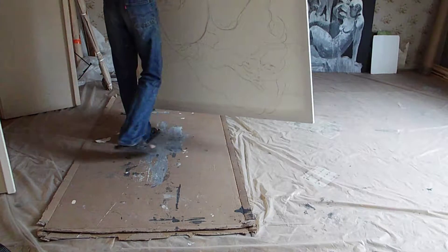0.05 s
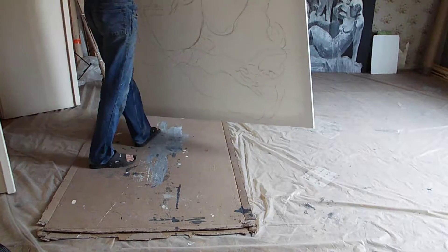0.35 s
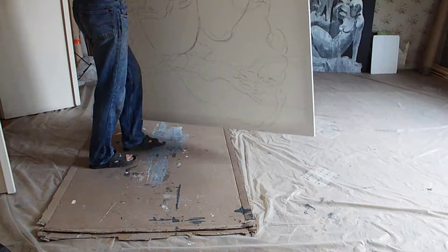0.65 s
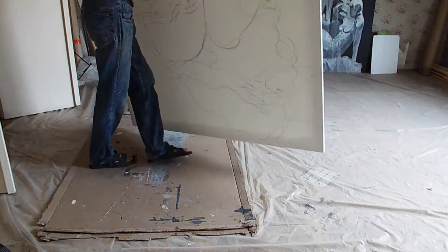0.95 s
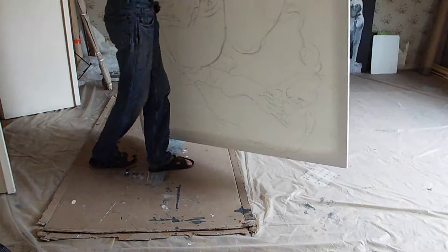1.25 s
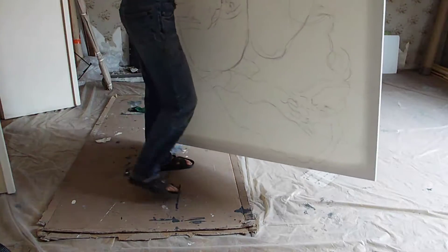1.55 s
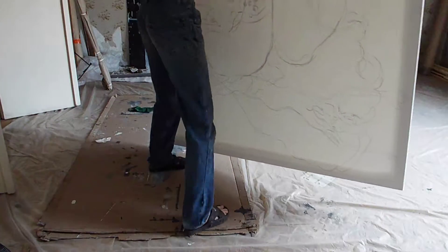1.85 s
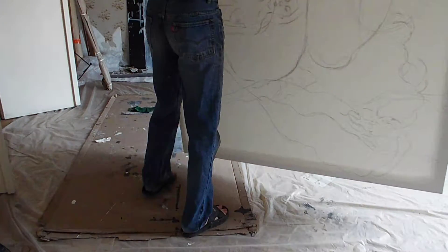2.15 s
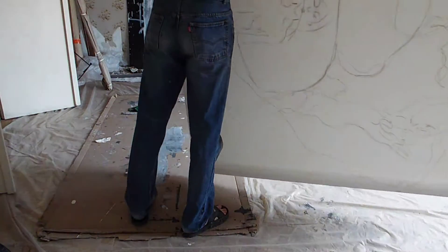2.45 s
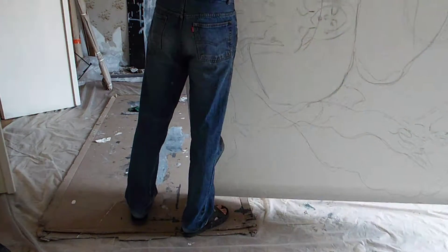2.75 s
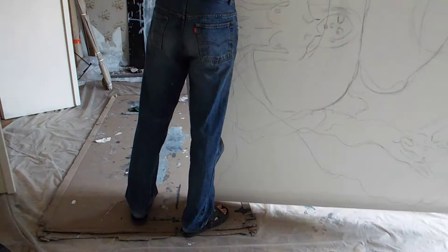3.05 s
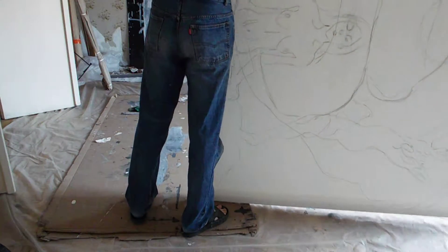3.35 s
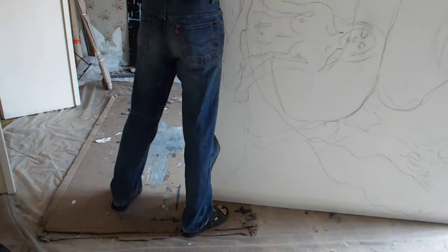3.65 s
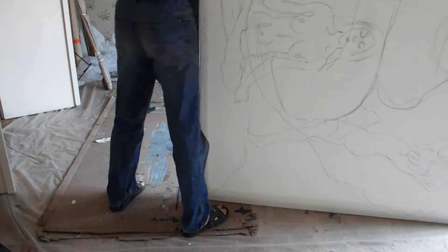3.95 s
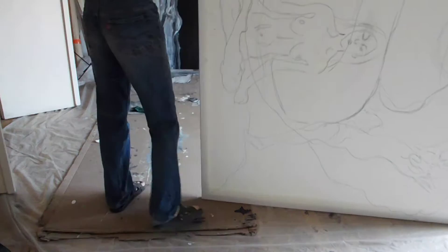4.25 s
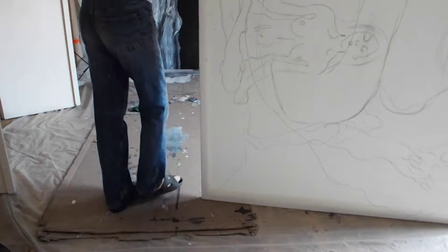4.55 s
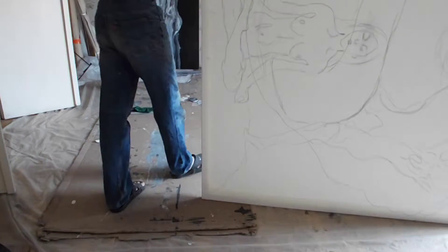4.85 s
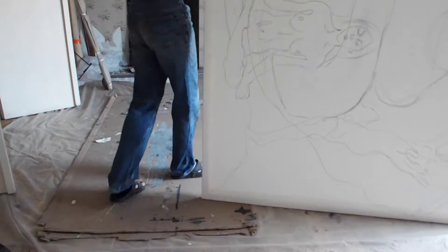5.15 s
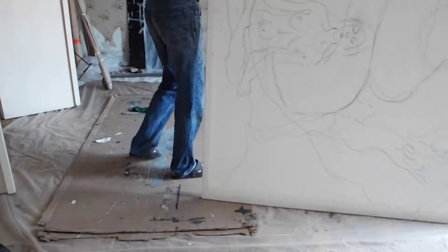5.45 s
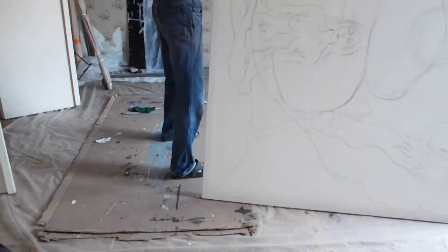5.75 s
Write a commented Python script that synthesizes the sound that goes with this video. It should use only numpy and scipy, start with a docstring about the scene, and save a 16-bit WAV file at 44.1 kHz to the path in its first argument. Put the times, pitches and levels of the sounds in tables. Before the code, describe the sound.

Scuffing footsteps on cardboard, then a big canvas lands with a ringing hollow thud amid light plastic rustling in a bare room.

```python
"""A big stretched canvas is carried across a studio and set down with one hollow, drum-like thud.
The cloth sways on the way; the wooden frame knocks on the floor and the cloth rings in its modes.
Sandals scuff, thump, tick and squeak on cardboard, denim brushes, and plastic sheeting rustles
as the canvas is shifted. The bare room rings on, over room tone and a faint distant rush."""
import sys
import numpy as np
from scipy import signal
from scipy.fft import rfft, irfft, next_fast_len
from scipy.io import wavfile

SR = 44100
rng = np.random.default_rng(int(sys.argv[2]) if len(sys.argv) > 2 else 0)


def store_wav(level_fs):
    """Save 16-bit WAV to argv[1]."""
    pcm = np.round(np.clip(np.atleast_2d(level_fs), -1, 1) * 32767)
    wavfile.write(sys.argv[1], SR, pcm.T.astype(np.int16))


N = 264159
T = np.arange(N) / SR


def amp(db):
    """Decibels to gain."""
    return 10 ** (np.asarray(db) / 20)


def unit_rms(x):
    """x scaled to rms 1."""
    return x / np.sqrt(np.mean(x ** 2) + 1e-20)


def log_interp(points, hz):
    """(freq_hz, value) points read on a log axis."""
    freq_hz, values = np.transpose(points)
    return np.interp(np.log(hz + 1), np.log(freq_hz + 1), values)


def gain_curve(points):
    """(time_s, level_db) points as one gain per sample."""
    return amp(np.interp(T, *np.transpose(points)))


def filtered(x, response):
    """x through a gain that depends on frequency."""
    n = x.shape[-1]
    size = next_fast_len(n + 8192, True)
    return irfft(rfft(x, size) * response(np.fft.rfftfreq(size, 1 / SR)), size)[..., :n]


def coloured(x, spectrum):
    """x shaped by (freq_hz, gain_db) points, at rms 1."""
    return unit_rms(filtered(x, lambda hz: amp(log_interp(spectrum, hz))))


def noise(spectrum):
    """Coloured Gaussian noise."""
    return coloured(rng.standard_normal(N), spectrum)


def resonance(centre_hz, width_hz):
    """Noise in one resonant band."""
    white = rng.standard_normal(N)
    return unit_rms(filtered(white, lambda hz: 1 / (1 + ((hz - centre_hz) / width_hz) ** 2)))


def slips(rate_per_s, spread_db):
    """Tiny random slips of uneven size."""
    impulses = (rng.random(N) < rate_per_s / SR) * rng.standard_normal(N)
    return unit_rms(impulses * amp(spread_db * rng.standard_normal(N)))


def burst(start_s, rise_s, hold_s, t60_s):
    """Envelope: linear rise, hold, exponential decay."""
    age_s = T - start_s
    decay = np.exp(-np.log(1000) * np.clip((age_s - rise_s - hold_s) / t60_s, 0, 10))
    return np.clip(age_s / rise_s, 0, 1) * decay


def widen(pair, width):
    """Mid and side to left and right; width is (freq_hz, side_db) points."""
    side = filtered(pair[1], lambda hz: amp(log_interp(width, hz)))
    return np.array([pair[0] + side, pair[0] - side])


# room tone spectrum: freq_hz, gain_db
TONE_SPECTRUM = [(15, -19), (25, -1), (98, -2), (136, -0.5), (178, -10.5), (252, -9.5), (305, -12),
                 (508, -15), (720, -15.5), (994, -18.5), (2550, -23.5), (4240, -26), (6020, -21),
                 (8770, -31.5), (15400, -37.5)]
# its stereo width: freq_hz, side_db
TONE_WIDTH = [(30, -10), (100, -7), (350, -4.5), (1200, -7), (4000, -6.5), (14000, -1.5)]


def room_tone():
    """Steady, low-heavy stereo noise."""
    return amp(-52) * widen([noise(TONE_SPECTRUM), noise(TONE_SPECTRUM)], TONE_WIDTH)


def cloth_sway(sway_hz=33.2, hum_hz=246.2):
    """Swung round, the cloth sways in its lowest mode and hums in a higher one, never quite still."""
    swing = amp(-55.5) + amp(-45.5) * burst(0, 0.35, 0, t60_s=3.6)
    return swing * (resonance(sway_hz, 4) + amp(-16) * resonance(hum_hz, 12))


# distant rush: time_s, level_db
RUSH_LEVELS = [(0, -54.5), (.9, -58.5), (1.6, -61.5), (2.4, -67.5), (6, -65)]


def distant_rush():
    """A faint midrange band, loudest at the start."""
    return gain_curve(RUSH_LEVELS) * resonance(centre_hz=1054, width_hz=330)


# sole friction spectrum: freq_hz, gain_db
SOLE_SPECTRUM = [(530, -29), (900, -19), (1610, -11), (3840, -7.5), (4320, -4), (5750, 1.5), (6710, -1.5),
                 (7560, -7.5), (10300, -13), (13100, -19), (15400, -34)]
# sandal on cardboard: start_s, stroke_s, scuff_db, thump_db, pressure_0_to_1
FOOTFALLS = [(.142, 0.038, -39.5, -57.5, 0.3), (.2, 0.087, -45.5, -46.5, 0.42),
             (0.284, 0.05, -35.5, -58, 1), (.394, 0.045, -37.5, -62, 0.14), (0.996, 0.026, -35, -48, .25),
             (1.293, 0.044, -31, -52, 0.24), (1.754, 0.15, -46, -47, 0.5), (1.956, 0.074, -36.5, -52, 0.18),
             (2.223, 0.079, -29, -51.5, 0.04), (2.78, 0.078, -45.5, -65.5, 1),
             (4.853, 0.046, -48.5, -48.5, 0.2), (4.95, .07, -48.5, -54.5, 0.45),
             (5.205, 0.078, -42.5, -49.5, 0.34), (5.57, 0.15, -61, -52.5, 0.82),
             (5.75, 0.039, -44.5, -59, 0.84), (5.868, 0.092, -42.5, -56, .95)]
RISE_SHARE = 0.31  # of a stroke


def sole_scuffs(drag_db=-16, drag_s=0.096, t60_s=0.13):
    """Dense slips under a sole: a stroke, then a weaker drag. Pressure adds rasp, a light brush fizz."""
    grit = coloured(slips(rate_per_s=18000, spread_db=2.5), SOLE_SPECTRUM)
    rasp = filtered(grit, lambda hz: 1 / (1 + (hz / 3000) ** 4))
    fizz = filtered(grit, lambda hz: 1 - 1 / (1 + (hz / 8000) ** 8))
    out = np.zeros(N)
    for start_s, stroke_s, scuff_db, _, pressure in FOOTFALLS:
        rise_s = RISE_SHARE * stroke_s
        stroke = burst(start_s, rise_s, stroke_s - rise_s, t60_s)
        drag = amp(drag_db) * burst(start_s, rise_s, drag_s, t60_s)
        rasp_db, fizz_db = 1 + 6.5 * pressure, 4 - 12 * pressure
        friction = grit + (amp(rasp_db) - 1) * rasp + (amp(fizz_db) - 1) * fizz
        out += amp(scuff_db) * np.maximum(stroke, drag) * friction
    return out


# floorboard thump spectrum: freq_hz, gain_db
BOARD_SPECTRUM = [(30, -14), (55, -1), (110, 5), (170, -4), (260, -5.5), (500, -16.5), (1200, -50)]
# cardboard clap spectrum: freq_hz, gain_db
CLAP_SPECTRUM = [(120, -9.5), (280, -10.5), (550, -4), (900, -11), (1600, -13), (4000, -38)]


def foot_thumps():
    """Each footfall thumps the boards; more pressure claps the cardboard harder."""
    boards, clap = noise(BOARD_SPECTRUM), noise(CLAP_SPECTRUM)
    out = np.zeros(N)
    for start_s, stroke_s, _, thump_db, pressure in FOOTFALLS:
        envelope = burst(start_s, RISE_SHARE * stroke_s, 0, t60_s=0.64)
        out += amp(thump_db) * envelope * (boards + amp(-5.5 + 10.5 * pressure) * clap)
    return out


# sandal snaps and popping creases: start_s, level_db, pitch_hz
TICKS = [(0.242, -31.5, 1350), (0.3018, -26, 3660), (0.3087, -18.5, 6000), (1.1392, -31, 5130),
         (1.6387, -44, 5340), (1.7413, -26, 1920), (1.7493, -21, 1560), (4.8815, -38, 4860)]


def ticks(crack_db=-8, ring_cycles=12):
    """A snap is a brief ring with a short crack; lower snaps have duller cracks."""
    crack = noise([(300, -9.5), (1400, 2.5), (3000, 3.0), (6500, 5.5), (14000, -16)])
    out = np.zeros(N)
    for start_s, level_db, pitch_hz in TICKS:
        ring = np.sin(2 * np.pi * pitch_hz * (T - start_s))
        ring *= burst(start_s, 0.00035, 0.00043, t60_s=ring_cycles / pitch_hz)
        cutoff_hz = min(2.95 * pitch_hz, SR / 3)
        dulled = signal.lfilter(*signal.butter(2, cutoff_hz, fs=SR), crack)
        dulled *= burst(start_s, 0.0003, 0.0016, t60_s=0.018)
        out += amp(level_db) * (ring + amp(crack_db) * dulled)
    return out


# denim brushing as the legs move: time_s, level_db
DENIM_LEVELS = [(0, -76), (.9, -74), (1.25, -49.5), (1.6, -59), (2.6, -66), (3, -54), (4.6, -63), (6, -52)]
# canvas and feet shoving over the sheeting: start_s, hold_s, level_db
SHOVES = [(3.062, .01, -46.5), (3.286, 0.17, -38.5), (3.485, .04, -31), (3.745, .01, -41.5),
          (3.891, 0.021, -39), (4.054, 0.055, -39), (4.205, 0.039, -43.5), (5.03, 0.21, -45.5),
          (5.207, 0.23, -43), (5.507, 0.031, -52), (5.9, 0.061, -45.5)]
# rustle spectrum: freq_hz, gain_db
RUSTLE_SPECTRUM = [(590, -50), (1000, -32), (1260, -14), (1390, -13.5), (1600, -14.5), (2500, -13),
                   (3140, -8), (4690, -6), (5760, -0.5), (9000, -13), (12700, -17.5), (15400, -31)]


def denim_and_sheeting(rise_s=0.047, settle_t60_s=0.78):
    """Denim brushes softly; thin plastic crinkles with each shove, then settles."""
    shove_power = sum((amp(level_db) * burst(start_s, rise_s, hold_s, settle_t60_s)) ** 2
                      for start_s, hold_s, level_db in SHOVES)
    crinkle = coloured(slips(rate_per_s=12000, spread_db=1.0), RUSTLE_SPECTRUM)
    return np.sqrt(shove_power + gain_curve(DENIM_LEVELS) ** 2) * crinkle


# faint sole squeaks: start_s, hold_s, pitch_hz, width_hz, level_db
SQUEAKS = [(1.318, 0.086, 1948, 400, -49.5), (5.227, 0.11, 1395, 7.2, -52.5), (5.656, 0.02, 1680, 227, -47),
           (5.7, .012, 1684, 93, -50), (5.748, .018, 1867, 66, -55)]


def sole_squeaks(rise_s=0.013):
    """Rubber sticks and slips: a tone whose phase wanders."""
    out = np.zeros(N)
    for start_s, hold_s, pitch_hz, width_hz, level_db in SQUEAKS:
        wander_rad = np.cumsum(rng.standard_normal(N)) * np.sqrt(2 * np.pi * width_hz / SR)
        tone = unit_rms(np.sin(2 * np.pi * pitch_hz * T + wander_rad))
        out += amp(level_db) * burst(start_s, rise_s, hold_s, t60_s=0.049) * tone
    return out


# wooden knock spectrum: freq_hz, gain_db
WOOD_SPECTRUM = [(50, -33), (110, -5.5), (220, 2.5), (380, -3), (550, -6.5), (750, -11.5), (1000, -14),
                 (1500, -11), (2200, -19), (3500, -28.5), (9000, -58)]
# sheeting slap spectrum: freq_hz, gain_db
SLAP_SPECTRUM = [(1200, -38), (2000, -17), (2900, -11), (4200, -2), (5200, -3), (6500, 2.5), (8500, -16),
                 (12500, -25), (15500, -42)]
# frame edge meeting the floor: start_s, wood_db, slap_db, crack_db
CONTACTS = [(3.4529, -8.5, -13, -14.5), (3.4621, -10, -18, -10), (3.467, -14.5, -17, -12),
            (3.482, -10, -19, -24)]


def frame_knocks():
    """The frame lands in quick contacts, each a wooden knock, a slap on the sheeting and a crack."""
    wood, slap = noise(WOOD_SPECTRUM), noise(SLAP_SPECTRUM)
    crack = noise([(400, 8), (1200, -6), (3000, -0.5), (6500, 1.0), (12000, -8), (16000, -23)])
    out = np.zeros(N)
    for start_s, wood_db, slap_db, crack_db in CONTACTS:
        out += amp(wood_db) * burst(start_s, 0.00072, 0, t60_s=0.068) * wood
        out += amp(slap_db) * burst(start_s, 0.00044, 0, t60_s=0.047) * slap
        out += amp(crack_db) * burst(start_s, 0.00055, 0.00092, t60_s=0.0053) * crack
    return out


# modes of stretched cloth and frame: pitch_hz, level_db, t60_s
CANVAS_MODES = [(33.2, -19.5, 1.4), (76.5, -26, 1.73), (103.8, -27, 1.95), (121, -19, 1.17),
                (142.3, -22.5, 1.22), (159.2, -12.5, 0.84), (175.7, -29, 0.8), (222, -20, 0.28),
                (240.5, -15, 0.66), (247.4, -29, 0.97), (297.2, -25, 0.98), (334, -38, 0.86),
                (346, -17, 0.53), (363.5, -23.5, 0.85), (379.5, -18, 0.29), (476, -45, 0.43),
                (516, -24, 0.61), (530, -21.5, 0.58), (613, -33.5, 0.98), (752, -36.5, 1.16),
                (794, -36.5, 1), (820, -33.5, 0.81), (1360, -53, .6), (1579, -28, 0.66), (1690, -39, 0.42)]


def canvas_drum():
    """One deep push on landing, then a slack-drum ring; neighbouring modes swing in opposite senses."""
    start_s = CONTACTS[0][0]

    def mode(pitch_hz, level_db, t60_s):
        envelope = amp(level_db) * burst(start_s, 0.0034, 0, t60_s)
        return envelope * np.cos(2 * np.pi * pitch_hz * (T - start_s))

    ring = sum((-1) ** k * mode(*row) for k, row in enumerate(CANVAS_MODES))
    return ring - mode(pitch_hz=155, level_db=-7, t60_s=0.11)


# bare room's decay: freq_hz, t60_s
ROOM_DECAY = [(60, 0.37), (250, 0.94), (1000, 0.81), (3000, 0.65), (6000, 0.59), (10000, 0.36),
              (15000, 0.23)]
# stereo width of its tails: freq_hz, side_db
TAIL_WIDTH = [(200, -24), (700, -17), (2000, -28), (4000, -15), (8000, -5), (14000, -5)]


def room(x, wet_db, crossfade_hz, tails, build_s=0.0046):
    """Direct sound plus several room tails, steadily cross-faded to keep the reverberation smooth."""
    shares = np.array([np.cos(2 * np.pi * crossfade_hz * (k + 1) * T + k) for k in range(tails)])
    shares /= np.linalg.norm(shares, axis=0)
    out = np.array([x, x])
    for share in shares:
        hz, age_s, spectra = signal.stft(rng.standard_normal((2, SR)), SR, nperseg=256)
        t60_s = log_interp(ROOM_DECAY, hz)[:, None]
        fade = amp(-60 * age_s / t60_s) * (1 - np.exp(-age_s / build_s))
        fade /= np.sqrt(np.sum(fade ** 2, axis=1, keepdims=True) * age_s[1] * SR)  # equal band energy
        tail = widen(signal.istft(spectra * fade, SR, nperseg=256)[1], TAIL_WIDTH)
        out += amp(wet_db) * signal.fftconvolve((x * share)[None], tail, axes=1)[:, :N]
    return out / np.hypot(1, amp(wet_db))


def scene():
    """All sources in the room, a little to the right."""
    movement = room(sole_scuffs() + denim_and_sheeting() + foot_thumps(),
                    wet_db=0.5, crossfade_hz=11, tails=4)
    sandals = room(ticks() + sole_squeaks(), wet_db=-2, crossfade_hz=1.5, tails=2)
    thud = room(frame_knocks(), wet_db=3.0, crossfade_hz=9, tails=3) + canvas_drum()
    background = room_tone() + cloth_sway() + distant_rush()
    return (movement + sandals + thud + background) * amp([[-0.85], [0.85]])


def record(dry, cutoff_hz=15750):
    """Soft clip at full scale, then a brick-wall low-pass."""
    clipped = dry / (1 + np.abs(dry) ** 8) ** (1 / 8)
    return filtered(clipped, lambda hz: hz < cutoff_hz)


dry = scene()
out = record(dry)
store_wav(out)
```